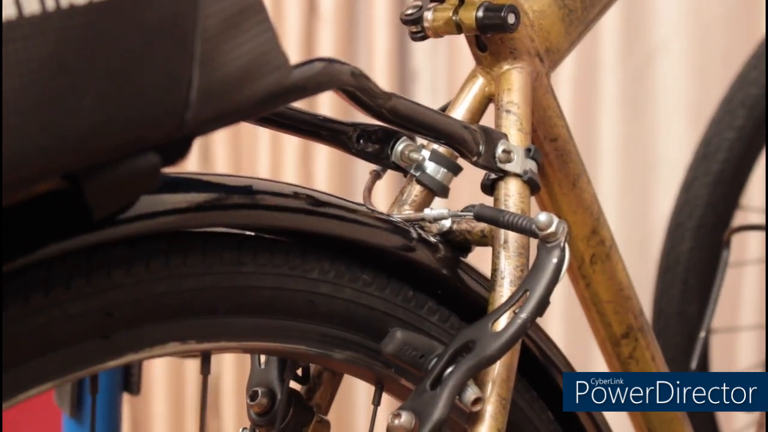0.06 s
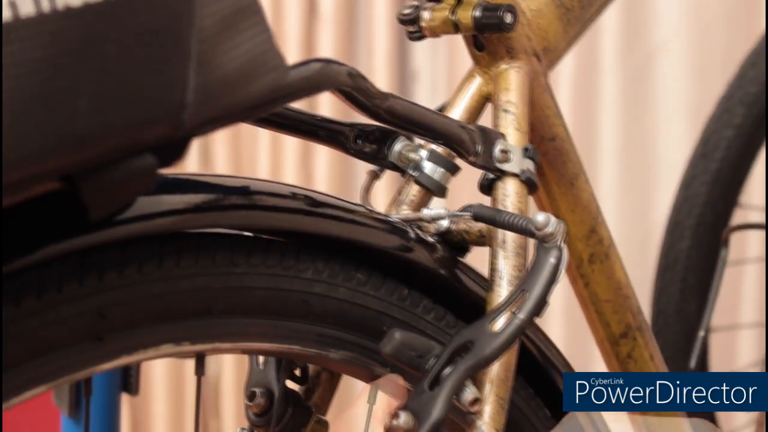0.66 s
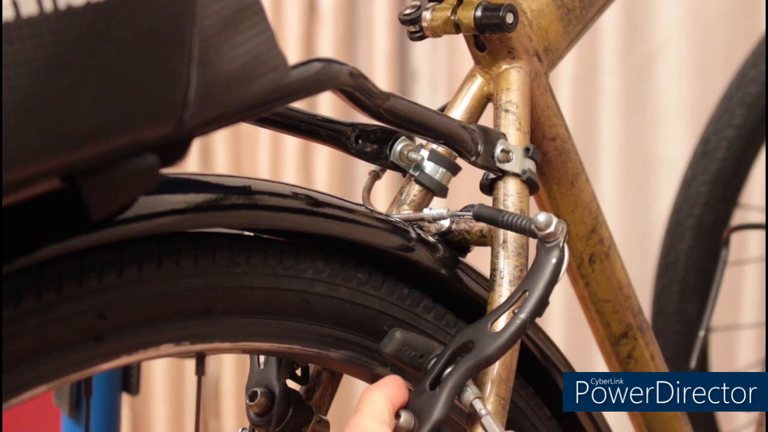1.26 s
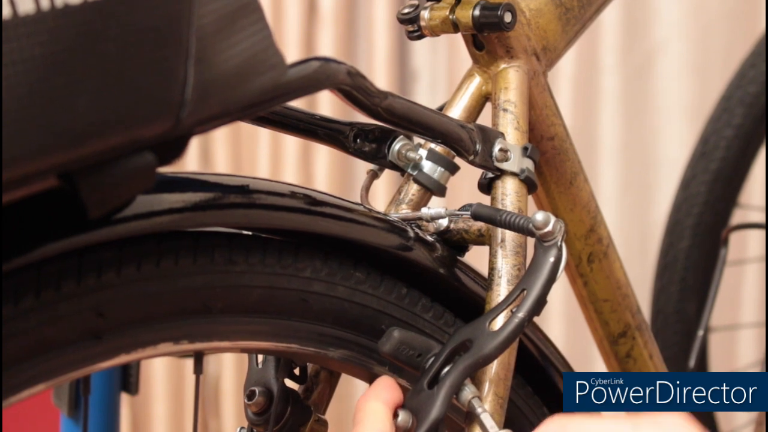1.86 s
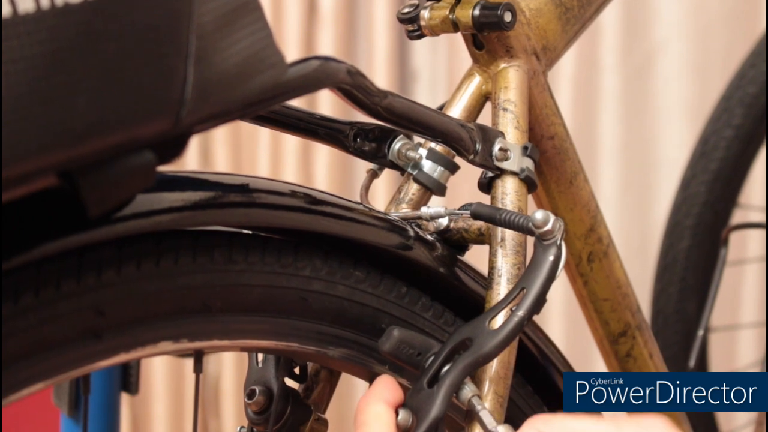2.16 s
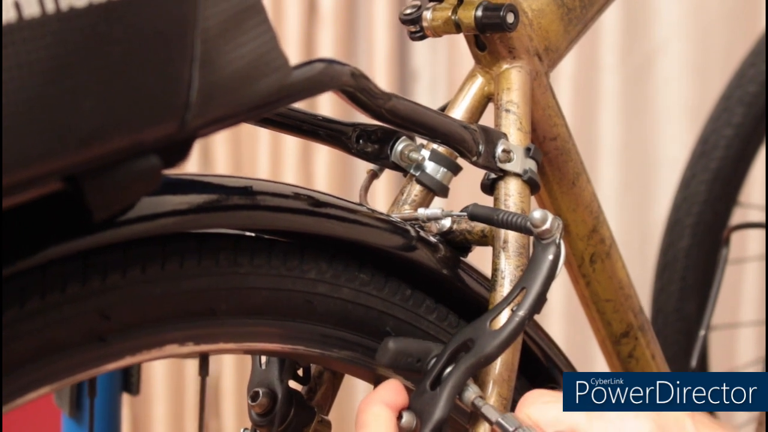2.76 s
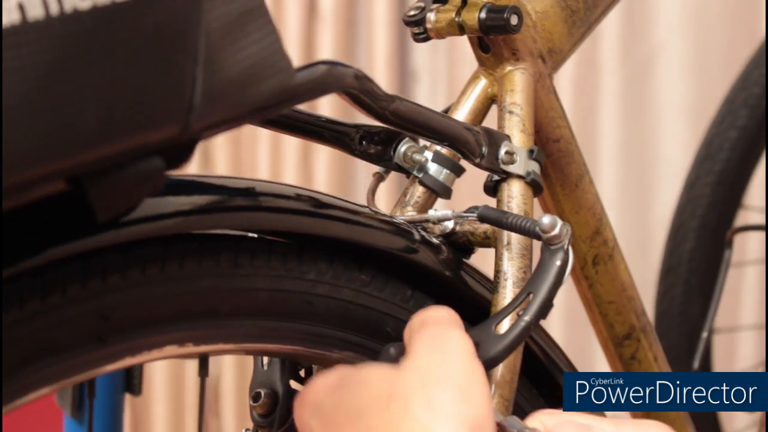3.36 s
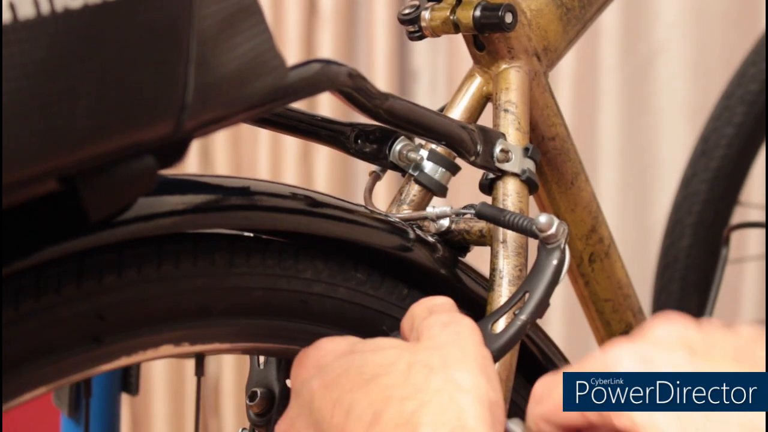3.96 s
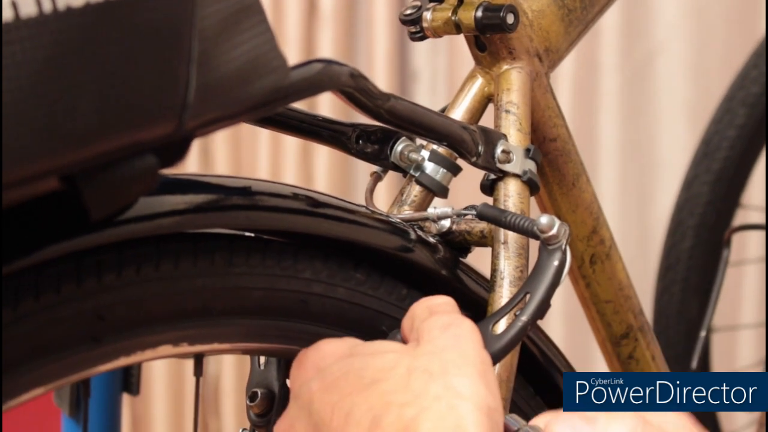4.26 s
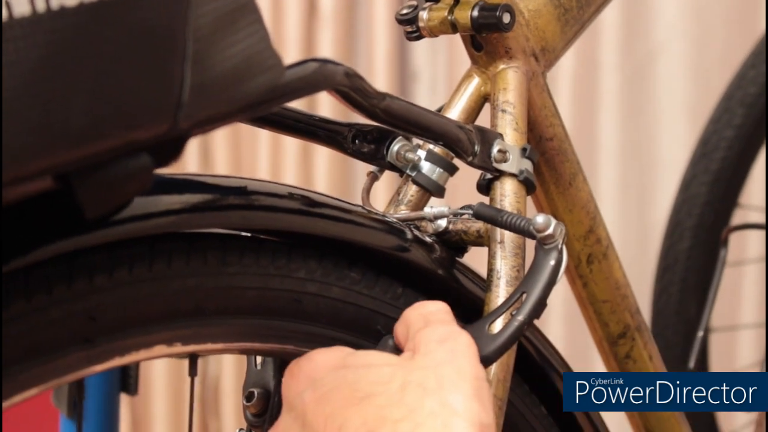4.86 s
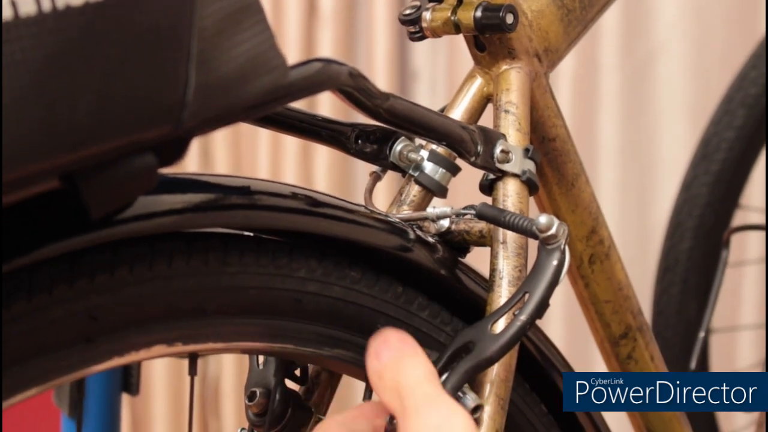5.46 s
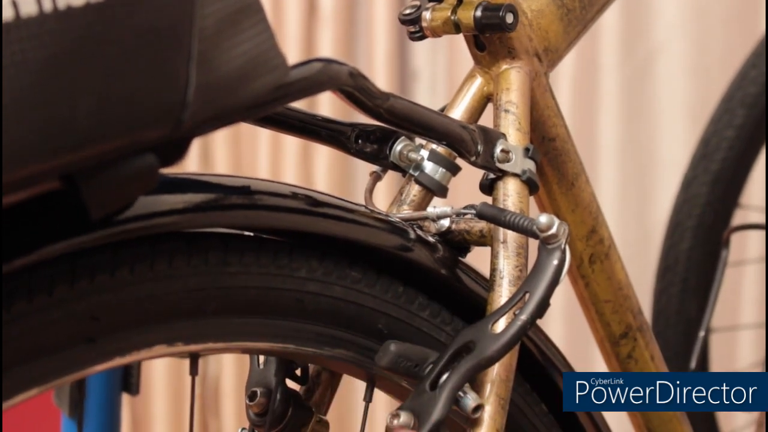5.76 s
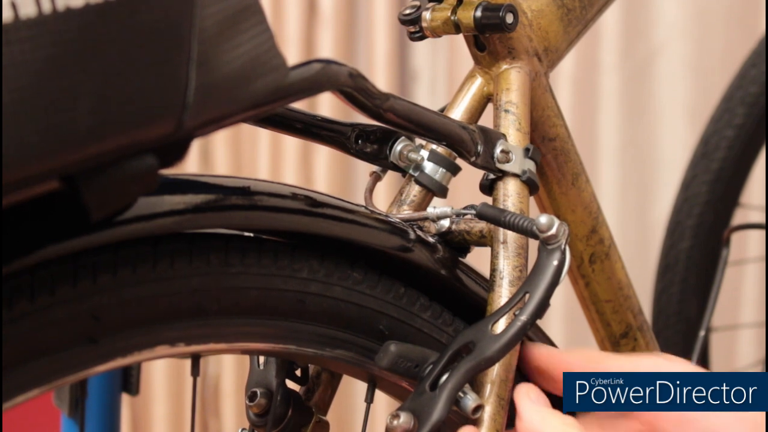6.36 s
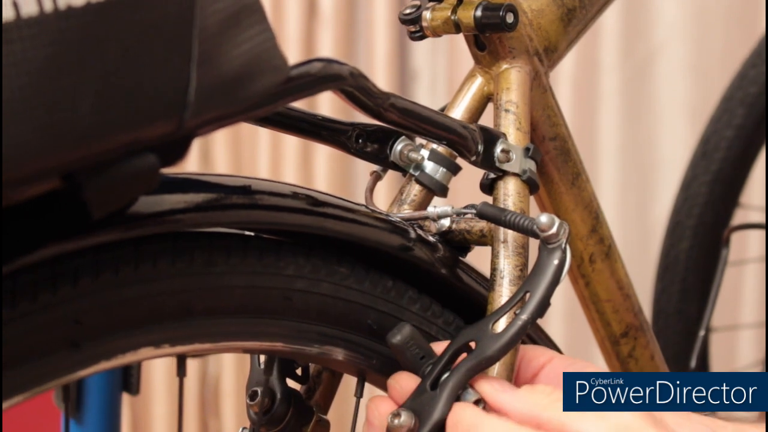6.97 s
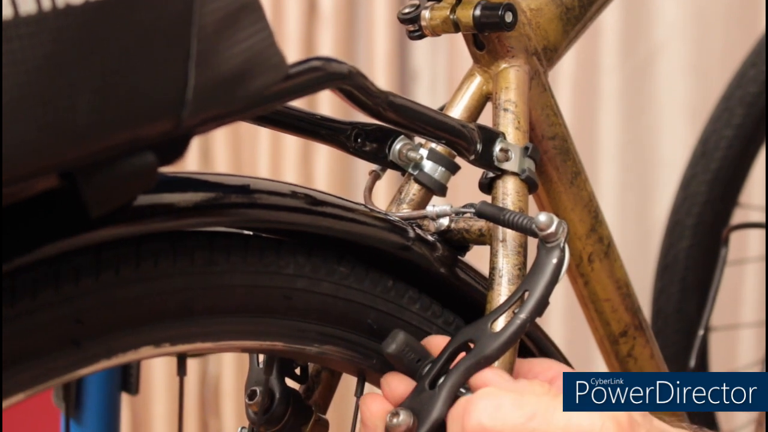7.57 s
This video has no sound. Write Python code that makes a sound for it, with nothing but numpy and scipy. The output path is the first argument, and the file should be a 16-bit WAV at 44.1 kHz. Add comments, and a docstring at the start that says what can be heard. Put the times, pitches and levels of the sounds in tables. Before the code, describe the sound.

Cloth rustle and soft thuds on a bicycle frame open this close take in a small workshop with faint hiss and low rumble. Washers tick and the brake arm knocks while a steel wrench gives bright, short clinks against a bolt, fastest around the middle. Then comes the loudest sound, the wrench clattering onto a wooden bench with a small bounce. Fingers rub, parts tap, and the brake pad gives one very short, high squeak.

```python
"""A small workshop, where a steel wrench works the pad bolt of a bicycle brake near one microphone.
Sleeve and fingers rustle by friction over a low rumble. Impacts excite damped modes: the frame booms,
washers tick, the brake arm knocks and the wrench clinks on the bolt in bursts. Dropped on a wooden
bench, the wrench bounces and rings; later the pad slips with one squeak.
The loudest blows overload the recorder."""
import sys
import numpy as np
from scipy import signal
from scipy.fft import rfft, irfft, next_fast_len
from scipy.io import wavfile
from scipy.ndimage import map_coordinates

SR = 44100
rng = np.random.default_rng(int(sys.argv[2]) if len(sys.argv) > 2 else 0)


def digitize_waveform(pressure):
    """Quantize a signal to 16-bit integers and store it at the path in sys.argv[1].

    Rows of a 2-D input are taken as channels; values are limited to [-1, 1].
    """
    field = np.atleast_2d(pressure).T
    bounded = np.clip(field, -1, 1)
    quanta = np.round(bounded * 32767).astype(np.int16)
    wavfile.write(sys.argv[1], SR, quanta)


N = 335590
TIME = np.arange(N) / SR
AGE = np.arange(SR // 2) / SR  # time since an impact [s]


def amp(db):
    """The decibel law: a level as an amplitude ratio."""
    return 10 ** (np.asarray(db) / 20)


def unit(x):
    """Normalisation to rms 1."""
    return x / np.sqrt(np.mean(x ** 2) + 1e-20)


def along(points, hz):
    """Interpolation of (frequency [Hz], value) points on a logarithmic frequency axis."""
    knots_hz, values = np.transpose(points)
    return np.interp(np.log(hz + 1), np.log(knots_hz + 1), values)


def fade(t60, t=AGE):
    """Exponential decay: 60 dB in t60 seconds."""
    return np.exp(-np.log(1000) * t / max(t60, 1e-4))


def add(track, start, sound):
    """Superposition of a sound on the track from start [s]."""
    part = track[round(start * SR):][:len(sound)]
    part += sound[:len(part)]


def noise(spectrum, size):
    """Spectral shaping: white noise becomes coloured noise of rms 1."""
    padded = next_fast_len(size)
    gain = amp(along(spectrum, np.fft.rfftfreq(padded, 1 / SR)))
    return unit(irfft(rfft(rng.standard_normal(padded)) * gain, padded)[:size])


def wobble(rate):
    """Random modulation: a smooth curve through rate knots a second."""
    return map_coordinates(rng.standard_normal(int(N * rate / SR) + 4), [TIME * rate])


def burst(spectrum, t60, tilt=((100, 0), (10000, 0))):
    """Modal overlap: dense, damped modes merge into decaying noise, coloured for each blow by tilt."""
    hz = np.fft.rfftfreq(len(AGE), 1 / SR)
    envelope = fade(t60)
    tilted = irfft(rfft(noise(spectrum, len(AGE))) * amp(along(tilt, hz)), len(AGE))
    return unit(tilted * envelope) * np.std(tilted) * np.sqrt(np.mean(envelope ** 2))


def ring(modes, scatter_db, t=AGE):
    """Free vibration of (frequency [Hz], level [dB], T60 [s]) modes, varied in strength and sign."""
    return sum(amp(db + scatter_db * rng.standard_normal()) * np.sin(2 * np.pi * hz * t)
               * fade(t60, t) * rng.choice([-1, 1]) for hz, db, t60 in modes)


def stroke(start, length, attack_s, fall_db_per_s):
    """Envelope of a movement: a linear rise to 1 at start, a hold, then exponential decay."""
    rise = np.clip(1 + (TIME - start) / max(attack_s, 1e-4), 0, 1)
    return rise * amp(-fall_db_per_s * np.maximum(TIME - start - length, 0))


def strokes(rows, attack_s, fall_db_per_s):
    """Incoherent summation: the powers of overlapping movements add."""
    return np.sqrt(sum((amp(db) * stroke(start, length, attack_s, fall_db_per_s)) ** 2
                       for start, length, db in rows))


# reverberation time of the workshop: (frequency [Hz], T60 [s])
ROOM_DECAY = [(100, 0.28), (500, 0.38), (1300, 0.36), (3500, 0.29), (9000, 0.21), (15000, 0.12)]
def in_room(direct, wet_db, gap_s=0.0025):
    """Reverberation: the walls add a diffuse tail in which each band decays at its own rate."""
    hz, t, bands = signal.stft(rng.standard_normal(len(AGE)), SR, nperseg=256)
    decay = np.exp(-np.log(1000) * t / along(ROOM_DECAY, hz)[:, None])
    tail = signal.istft(bands * decay, SR, nperseg=256)[1][:len(AGE)]
    tail *= np.clip(AGE / gap_s - .5, 0, 1)
    return direct + amp(wet_db) * signal.fftconvolve(direct, tail / np.linalg.norm(tail))[:len(direct)]


# steady room noise: (frequency [Hz], spectral level [dB])
AMBIENT_SPECTRUM = [(20, -4), (50, -7), (90, -2), (135, -5), (180, 0), (220, -6), (270, -11.5), (400, -17),
                    (700, -22), (1300, -29), (2500, -30), (6000, -36.5), (15000, -45)]
# swells of rumble as things are moved: (time [s], duration [s], level [dB])
RUMBLE_SWELLS = [(0, .45, -42.5), (2.0, .75, -44), (3.65, 0.33, -43.5), (4.95, 0.1, -35), (5.53, .05, -24),
                 (6.05, .08, -38.5), (6.7, 0.58, -42.5)]
def background():
    """Ambient noise: a steady bed over a deep rumble whose drift and swells add in power."""
    rumble = noise([(10, -25), (22, 5.5), (28, 4), (38, 5.5), (47, -3.5), (65, -23), (200, -50.5)], N)
    drift = amp(-49.5 + 1.5 * wobble(rate=3))
    swells = strokes(RUMBLE_SWELLS, attack_s=0.051, fall_db_per_s=48)
    return amp(-44) * noise(AMBIENT_SPECTRUM, N) + np.hypot(drift, swells) * rumble


# sliding cloth: (frequency [Hz], spectral level [dB])
SLEEVE_SPECTRUM = [(150, -7), (400, 0.5), (1200, -2), (2600, 0), (4000, -6.5), (7000, -8), (11000, -11.5),
                   (16000, -18.5)]
def sleeve():
    """Sliding friction: cloth noise sinks as the arm reaches in and slows down."""
    reach = stroke(start=0.049, length=0.4, attack_s=0.13, fall_db_per_s=130)
    level_db = -41 - 9.5 * TIME + 1.1 * wobble(rate=24.4)
    return reach * amp(level_db) * noise(SLEEVE_SPECTRUM, N)


# hand and wheel bump the frame: (time [s], boom level [dB], thud level [dB])
FRAME_BUMPS = [(0.329, -34.5, -30), (0.931, -36, -35), (0.975, -38, -31.5), (2.385, -33.5, -27.5),
               (2.405, -44, -25), (2.942, -32.5, -44), (3.13, -42, -38.5), (3.461, -37, -31),
               (3.59, -34.5, -40.5), (4.646, -33, -44), (4.864, -38.5, -30), (4.90, -40, -30.5),
               (6.544, -44, -28)]
# the frame on its tyres: (frequency [Hz], level [dB], T60 [s])
FRAME_MODES = [(54.2, -1.5, .3), (76.7, 0, 0.56), (101.4, -9.5, 0.29)]
# a soft contact: (frequency [Hz], spectral level [dB])
THUD_SPECTRUM = [(60, -17), (150, 7.5), (330, 5), (480, -6), (700, -6), (1500, -41), (5000, -59)]
def frame_bumps():
    """Soft impact: a slow contact excites low frequencies, a muffled thud and the frame's boom."""
    out = np.zeros(N)
    onset = 1 - np.exp(-AGE / 0.0015)
    for start, boom_db, thud_db in FRAME_BUMPS:
        boom = amp(boom_db - 1.5) * ring(FRAME_MODES, scatter_db=0.94)
        thud = amp(thud_db) * in_room(burst(THUD_SPECTRUM, t60=0.074), wet_db=-6)
        add(out, start, (boom + thud) * onset)
    return out


# finger strokes on the brake: (time [s], duration [s], level [dB])
FINGER_RUBS = [(.47, 0.033, -50), (3.17, 0.7, -49), (4.35, 0.22, -56), (5.8, 0.18, -52.5),
               (6.72, 0.12, -51), (6.9, 0.093, -45.5), (7.15, 0.12, -58.5), (7.54, .07, -52.5)]
# rubbing skin: (frequency [Hz], spectral level [dB])
FINGER_SPECTRUM = [(120, -8.5), (350, 4), (700, -0.5), (1100, -0.5), (1700, -5.5), (2800, -10),
                   (6000, -12.5), (14000, -22)]
def fingers():
    """Friction noise: fingers rub in uneven strokes, and a resting hand rustles faintly."""
    resting_hand = (1.8, 6, -59)  # one long stroke
    rubbing = strokes(FINGER_RUBS + [resting_hand], attack_s=0.12, fall_db_per_s=46)
    unevenness = amp(2.1 * wobble(rate=16) + 2.4 * wobble(rate=170))
    return in_room(rubbing * unevenness * noise(FINGER_SPECTRUM, N), wet_db=-2)


# light contacts of tool, washers and cable: (time [s], level [dB], low tilt [dB], treble tilt [dB])
LIGHT_CONTACTS = [(0.6449, -26.5, -12.5, -8.5), (0.7673, -31.5, -21, -23), (0.9608, -25.5, -8, -12),
                  (1.891, -23, -14, -10.5), (2.147, -25, -10.5, -23), (2.6824, -35, -16, -14),
                  (3.4527, -22, -24, -19), (3.46, -22.5, -30, -10), (3.6414, -29.5, -11, -26),
                  (3.9676, -27, -32, -13.5), (4.012, -25.5, -12, -26), (4.2297, -18.5, -20.5, -9.5),
                  (4.5996, -36, -10.5, -13), (4.6483, -32.5, -28, -15), (7.1065, -28.5, -15, -12),
                  (7.145, -29, -13.5, -22)]
# the crack of a light contact: (frequency [Hz], spectral level [dB])
TICK_SPECTRUM = [(200, -17), (1000, 4), (2300, -0.5), (3100, -5.5), (4200, -1.5), (6500, -5.5), (9000, -3),
                 (11000, -1), (16000, -28)]
def ticks():
    """Hard impact: a brief contact gives a broadband crack and rings the washers faintly."""
    out = np.zeros(N)
    for start, db, low_db, treble_db in LIGHT_CONTACTS:
        tilt = [(1500, low_db + 11), (3500, 0), (6500, 0), (10000, treble_db + 8)]
        crack = burst(TICK_SPECTRUM, t60=0.023, tilt=tilt)
        washer = ring([(3090, -21, 0.096), (4850, -29, 0.024)], scatter_db=4.6)
        add(out, start, amp(db - 3) * in_room(crack + washer, wet_db=-4.5))
    return out


# arm and pad strike rim or frame: (time [s], level [dB], low tilt [dB], treble tilt [dB])
ARM_KNOCKS = [(0.912, -21, -22, -3), (0.963, -31, -9, -13), (1.318, -40, -7.5, -19),
              (1.607, -34.5, -0.5, -13.5), (2.188, -38.5, 3.5, -16), (2.36, -19, -12.5, -3.5),
              (2.375, -22.5, -1.5, -34), (2.88, -37, -15, -17.5), (2.898, -31, 2, -17),
              (3.13, -26, -13, -11), (3.433, -31, -1, -21), (4.393, -37, -3, -8), (4.864, -38.5, 10, -14),
              (4.899, -35.5, -15, -15), (5.813, -19.5, -7, -19), (6.732, -37, -5, -22),
              (6.884, -24, -27, -9.5), (7.523, -25, -25, -15)]
# the rattle of rim and frame: (frequency [Hz], spectral level [dB])
RATTLE_SPECTRUM = [(40, -15), (90, -18), (330, 7), (600, -2), (1100, 1.5), (1700, -6), (2400, -7),
                   (3300, -7.5), (4300, -9), (6200, -7), (8500, -22), (15000, -27)]
# the brake arm: (frequency [Hz], level [dB], T60 [s])
ARM_MODES = [(807, -8, 0.085), (1134, -1, 0.089), (1320, -10, 0.086), (1629, -3, .1), (2215, -3.5, 0.076),
             (3177, -9, 0.067), (4250, -8, .06), (5500, -11, 0.054)]
def brake_knocks():
    """Impact excites both bodies: the brake arm rings briefly, and rim or frame gives a dull rattle."""
    out = np.zeros(N)
    for start, db, low_db, treble_db in ARM_KNOCKS:
        tilt = [(350, low_db + 5), (700, 0), (2500, 0), (4500, treble_db + 8)]
        rattle = burst(RATTLE_SPECTRUM, t60=0.051, tilt=tilt)
        arm = amp(-13.5) * ring(ARM_MODES, scatter_db=2.2)
        add(out, start, amp(db - 1.5) * in_room(rattle + arm, wet_db=-4))
    return out


# the jaw strikes the bolt; the point of contact weights the modes: (time [s], onset level [dB],
# main mode [Hz], top mode [Hz], shank weight [dB], upper mode weight [dB], top mode weight [dB])
JAW_STRIKES = [(1.9351, -11.5, 8260, 14240, -8, -6, -8.5), (2.0271, -13, 8360, 13800, -10, -11.5, -8.5),
               (3.1767, -9.5, 7860, 13430, -8.5, -7.5, 0.5), (3.2115, -10, 9000, 13300, -6.5, 4, 4),
               (3.2373, -8.5, 9450, 13900, -4.5, -2, 7.5), (3.276, -10.5, 8300, 14600, -9.5, -1.5, -11.5),
               (3.3072, -9.5, 8460, 14600, -11.5, -7, -11), (3.3296, -6.5, 8200, 14200, -18.5, -6.5, -16),
               (3.355, -8, 9550, 14100, -11, -2, -10), (3.741, -4.5, 8690, 14280, -15, 3.5, -5),
               (3.7734, -7.5, 9500, 14900, -10.5, -2, -2.5), (3.8276, -6.5, 8550, 13830, -22, -16.5, -13),
               (4.2966, -9, 8450, 13860, -13, -17, -10.5)]
# steel on steel: (frequency [Hz], spectral level [dB])
CRACK_SPECTRUM = [(200, -7.5), (600, -25), (1200, -5), (1700, -9), (2300, -6), (3000, -11.5), (4200, 1.5),
                  (5500, -6), (7500, -4.5), (9300, -1), (10400, -4), (14600, 3.5), (16000, -5.5)]
def wrench_clinks():
    """Damping: the hand stops the wrench's modes within milliseconds, and only the shank sings on."""
    out = np.zeros(N)
    shank_modes = [(1644, -32.5, 0.24), (3920, -28, 0.26), (7160, -41, .2), (8000, -27.5, 0.34)]
    onset = np.minimum(1, (AGE + .0001) / 0.0012) ** 0.4  # the blow builds as the jaw chatters
    for start, db, main_hz, top_hz, shank_db, upper_db, top_db in JAW_STRIKES:
        grip = 1 + .01 * rng.standard_normal(3)  # the grip detunes three modes
        modes = [(4080 * grip[0], shank_db - 8.5, .02), (7050 * grip[1], -15.5, .016),
                 (main_hz, -5, .012), (11800 * grip[2], upper_db, .012), (top_hz, top_db + 3, .012)]
        tilt = [(4500, shank_db + 8.5), (7000, 4), (9800, -3),
                (11500, upper_db + 9.5), (13500, top_db - 1)]
        crack = burst(CRACK_SPECTRUM, t60=0.016, tilt=tilt)
        blow = (ring(modes, scatter_db=0.57) + amp(-3) * crack) * onset
        blow /= np.std(blow[AGE < .004])  # the first 4 ms set the level
        shank = ring(shank_modes, scatter_db=1.8)
        add(out, start, amp(db) * (in_room(blow, wet_db=-6) + shank))
    return out


# landings: (time [s], wood level [dB], clatter level [dB], steel level [dB], clatter corner [Hz])
LANDINGS = [(5.46, -21.5, -45, -56, 800), (5.4715, -6, -6.5, -26.5, 2090), (5.479, -2.5, -5, -32, 990),
            (5.566, -21.5, -12.5, -27, 7200), (5.577, -13, -18.5, -31, 3040)]
# the wooden bench top: (frequency [Hz], level [dB], T60 [s])
BENCH_MODES = [(154, -22, 0.15), (213, -5, 0.23), (283, -4, 0.15), (316.5, -5, .18), (347, -7, 0.37),
               (462, -13, 0.24), (502.3, -0.5, 0.22), (687, -12, 0.13), (860, -4.5, 0.12), (970, -18, .17),
               (1076, -23, .14), (1270, -33.5, 0.092), (1510, -19, 0.096), (1790, -16, .17),
               (1935, -18, 0.27)]
# steel on wood: (frequency [Hz], spectral level [dB])
CLATTER_SPECTRUM = [(100, -11.5), (250, 7), (800, 2.5), (1500, 1), (2200, -5.5), (3200, -1), (5000, -7),
                    (8500, -10.5), (11500, -9), (14000, -32)]
# the free wrench: (frequency [Hz], level [dB], T60 [s])
WRENCH_MODES = [(2832, 0, 0.17), (3682, -8, .19), (3957, -6, 0.32), (5997, -16, .25), (7225, 1, 0.26),
                (7290, -4, 0.27), (9775, -14, 0.22), (11500, -15, 0.24)]
# a low sway after the drop: (frequency [Hz], level [dB], T60 [s])
SWAY_MODES = [(47.1, -19, 0.5), (55.3, -17, 0.37)]
def wrench_drop():
    """Impact and rebound: one end lands, then the other; bench and wrench ring and a low sway follows."""
    out = np.zeros(N)
    wood_onset = 1 - np.exp(-AGE / 0.00066)
    for start, wood_db, clatter_db, steel_db, corner_hz in LANDINGS:
        wood = amp(wood_db - 4.5) * ring(BENCH_MODES, scatter_db=0.61) * wood_onset
        tilt = [(corner_hz, 0), (corner_hz * 4, -14)]
        clatter = amp(clatter_db - 1) * burst(CLATTER_SPECTRUM, t60=0.064, tilt=tilt)
        steel = amp(steel_db) * ring(WRENCH_MODES, scatter_db=0.51)
        add(out, start, in_room(wood + steel, wet_db=-12) + in_room(clatter, wet_db=1))
    sway = ring(SWAY_MODES, scatter_db=0.86, t=TIME) * (1 - np.exp(-TIME / 0.01))
    add(out, 5.485, sway)
    return out


def pad_squeak():
    """Stick-slip friction: the pad whistles, jumping in pitch with a weak octave as the grip gives."""
    low_hz, high_hz, jump_s, glide_s = 4920, 5590, 7.4985, .0008
    slip = (1 + np.tanh((TIME - jump_s) / glide_s)) / 2
    phase = 2 * np.pi * np.cumsum(low_hz + (high_hz - low_hz) * slip) / SR
    whistle = np.sin(phase) + amp(-14) * slip * np.sin(2 * phase)
    envelope = stroke(start=7.496, length=0.0054, attack_s=0.0057, fall_db_per_s=5003)
    return in_room(amp(-23.5) * envelope * whistle, wet_db=-9.5)


def scene():
    """Superposition: all sources sum at one microphone, heard alike in both ears."""
    impacts = wrench_clinks() + ticks() + brake_knocks() + frame_bumps() + wrench_drop()
    friction = pad_squeak() + sleeve() + fingers()
    mono = impacts + friction + background()
    return np.array([mono, mono])


# the recorder's own hiss: (frequency [Hz], spectral level [dB])
HISS_SPECTRUM = [(30, 0), (250, 3.5), (500, 6), (1000, 3), (2500, 3), (7000, 4.5), (15500, 4)]
def record(dry):
    """Saturation and band limiting: each channel gains hiss, flattens at full scale and is low-passed."""
    cutoff_hz = 16000
    noisy = dry + amp(-52.5) * np.array([noise(HISS_SPECTRUM, N), noise(HISS_SPECTRUM, N)])
    clipped = noisy / (1 + np.abs(noisy) ** 12) ** (1 / 12)
    padded = next_fast_len(N + SR // 2)
    passband = np.fft.rfftfreq(padded, 1 / SR) < cutoff_hz
    return irfft(rfft(clipped, padded) * passband, padded)[:, :N]


dry = scene()
out = record(dry)
digitize_waveform(out)
```